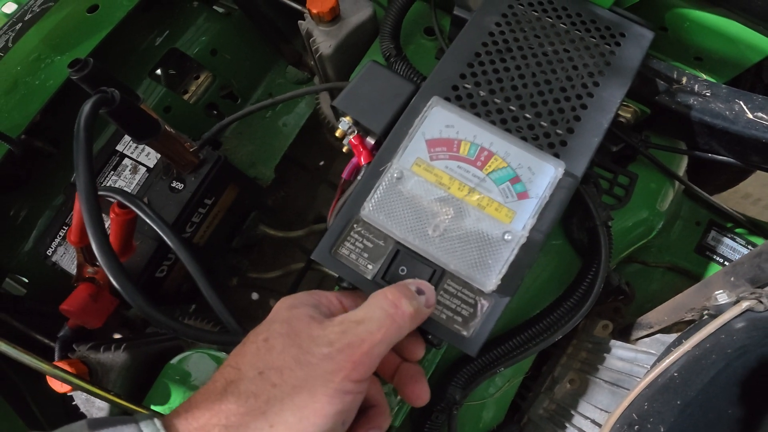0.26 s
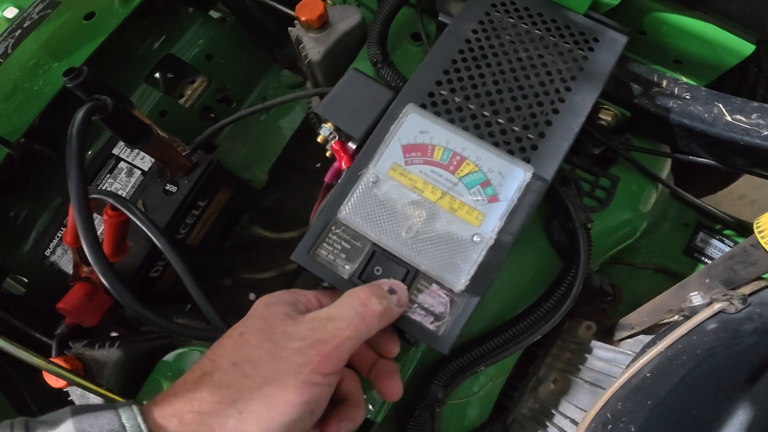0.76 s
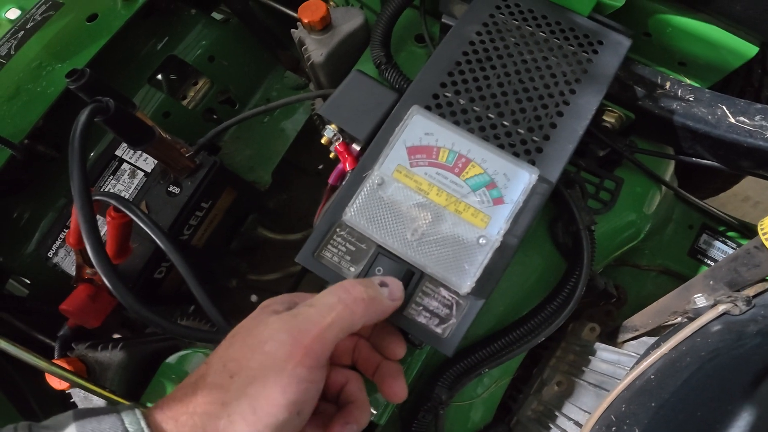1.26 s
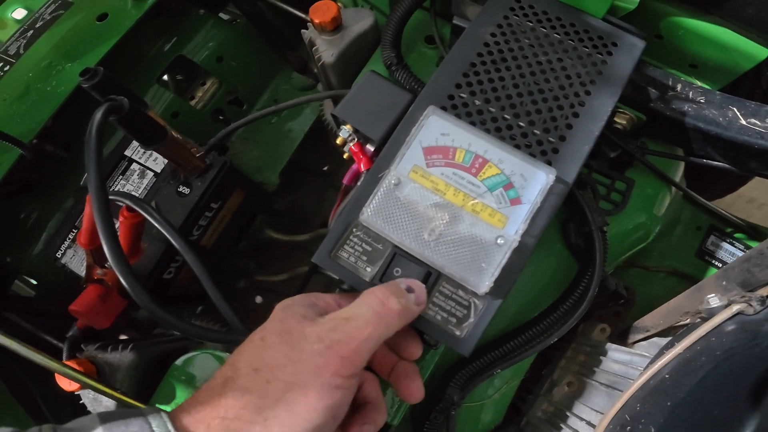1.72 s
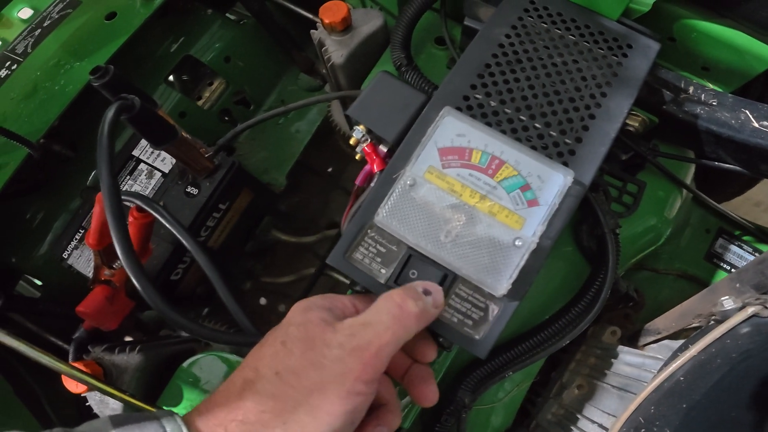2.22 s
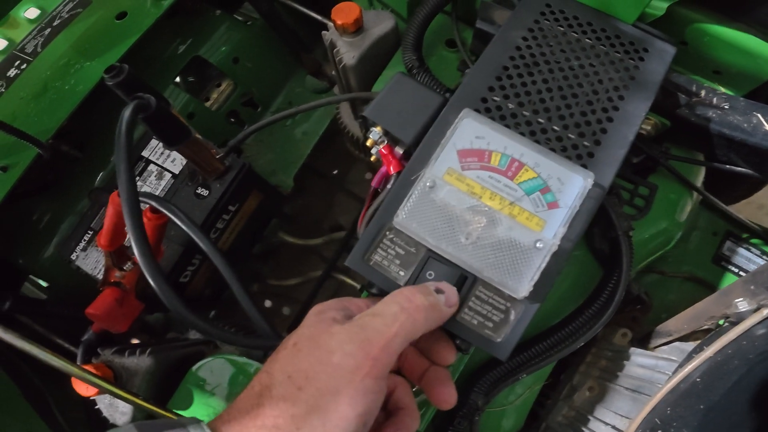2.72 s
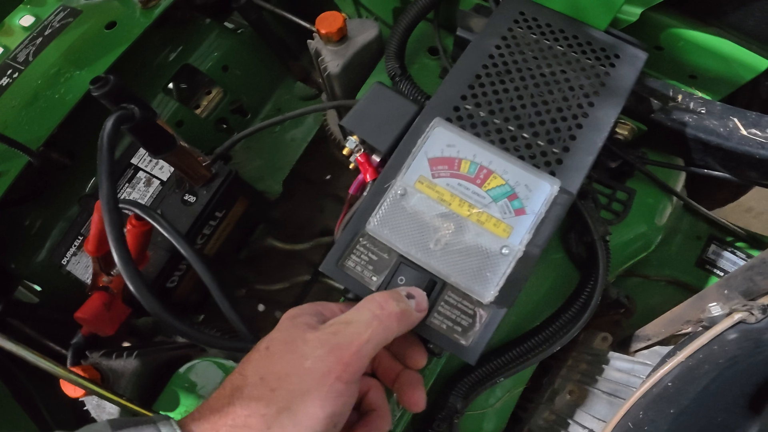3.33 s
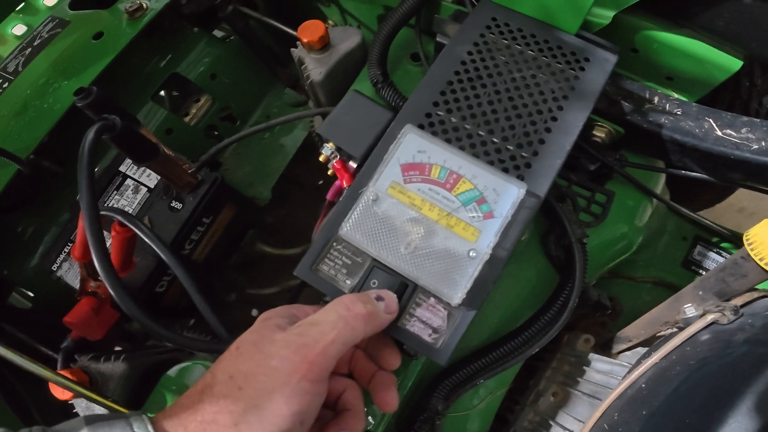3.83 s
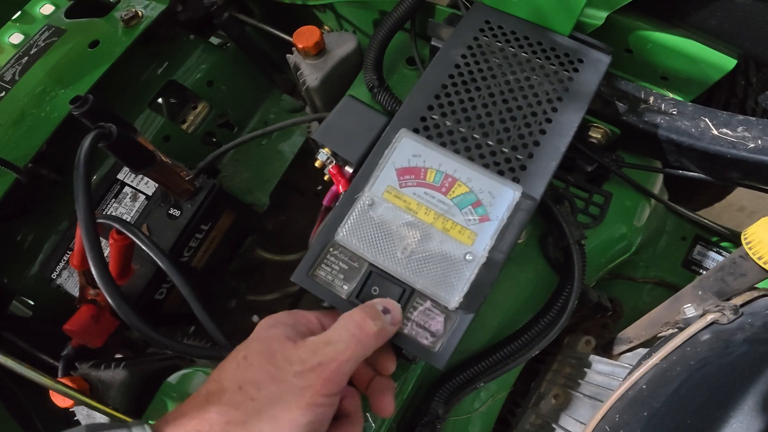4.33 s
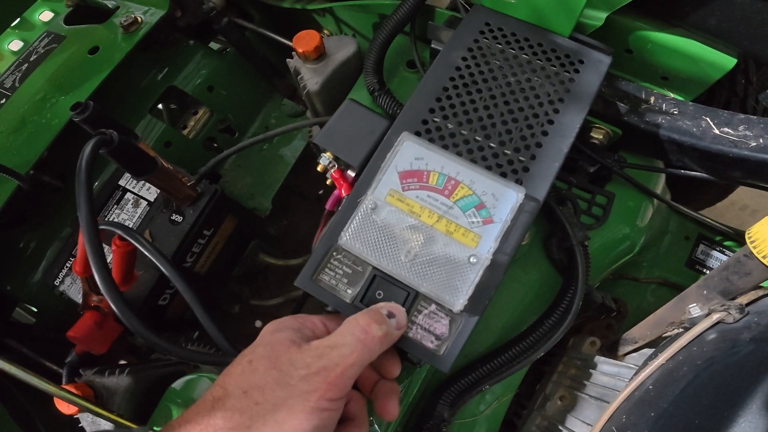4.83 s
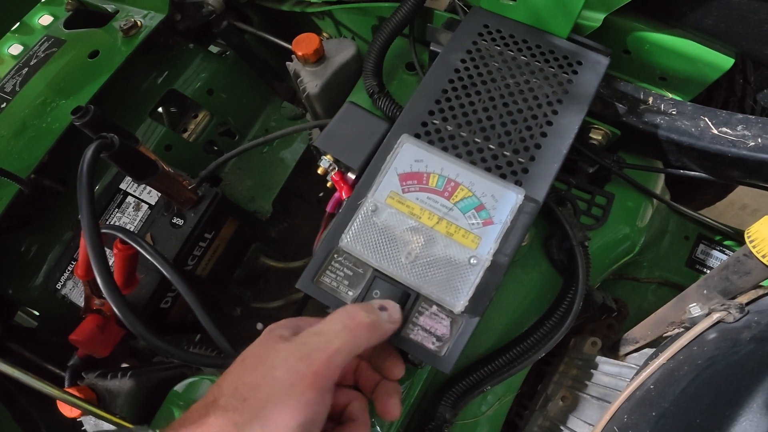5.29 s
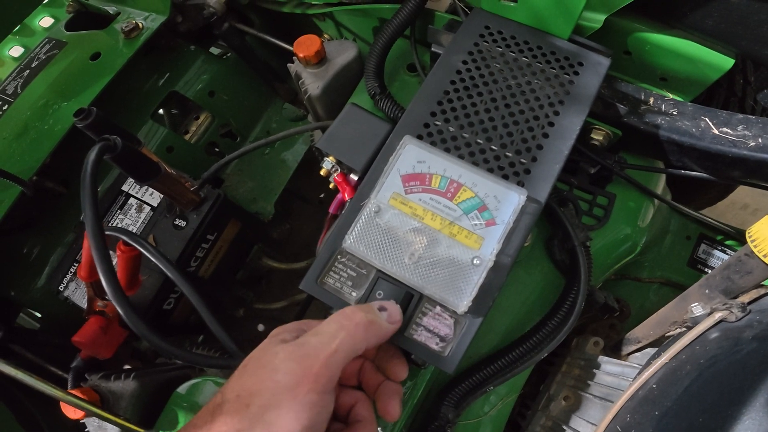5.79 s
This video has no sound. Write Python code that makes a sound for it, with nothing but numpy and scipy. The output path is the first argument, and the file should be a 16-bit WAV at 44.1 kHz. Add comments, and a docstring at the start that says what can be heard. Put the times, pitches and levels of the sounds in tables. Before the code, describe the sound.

A rocker switch on a hand-held battery tester springs back with a bright clack, leaving a brief metallic ring. A second later a press knocks hollowly in the steel case as relay contacts snap shut, and a faint hum begins to fade. Two more releases and presses follow, with faint taps and thumb rubs between them. The stereo microphone is close, in a quiet garage with low rumble.

```python
"""A hand-held battery load tester in a garage, close to a stereo microphone, over low rumble and hum.
First a thumb lets the rocker switch go: the relay contacts part with a snap, and a bright clack leaves
the spring and the steel case ringing. The hand shifts with faint taps. Then a press knocks hollowly in
the case, the contacts snap shut and rebound, and the hum starts to fade. Two more releases and presses
follow, with small ticks, bumps and rubs of the thumb around them."""
import sys
import numpy as np
from scipy import signal
from scipy.fft import rfft, irfft
from scipy.io import wavfile

SR = 44100
rng = np.random.default_rng(int(sys.argv[2]) if len(sys.argv) > 2 else 0)


def output_pcm(signal):
    """Save a mono or channel-first signal as 16-bit PCM at the path in sys.argv[1].

    Samples are clipped to [-1, 1] before scaling.
    """
    pcm = np.clip(np.atleast_2d(signal).T, -1, 1) * 32767
    wavfile.write(sys.argv[1], SR, np.round(pcm).astype(np.int16))


N = 266893
LEAD_IN, BURST = 2 ** 11, 2 ** 14  # samples: before time zero, in a noise burst
T = np.arange(SR) / SR  # the second after a blow
SOON = T[:BURST]  # long enough for a crack or an echo to die
HZ = np.fft.rfftfreq(BURST, 1 / SR)

# A blow is (t/s, level/dB, tilt/dB per octave, ring); ring multiplies the decay time of its crack.
# the rocker goes home: knock t/s, snap t/s, knock level/dB, knock ring, snap level/dB, snap ring,
# jolt level/dB
PRESSES = [(0.972, 1.0156, -0.74, 1.7, 0.27, 0.8, -13.5), (2.2642, 2.3025, 0, 1.48, 1.5, 0.9, -14.5),
           (5.3352, 5.3532, -0.47, 1.2, 3.5, 0.99, -7)]
# the mechanism springs back: t/s, level/dB, tilt/dB per octave, ring, spring level/dB,
# spring tilt/dB per octave, shift of the spring's low modes/%
RELEASES = [(-0.017, 2.5, 0.5, 1.34, 1.5, 0.5, -0.3), (1.8682, 0.5, 0.5, 1.44, 0.5, 0.5, 0),
            (4.271, 0, 0, 1.44, -3.5, 4, -1.2)]


def amp(db):
    """Decibels to gain."""
    return 10 ** (np.asarray(db) / 20)


def unit_rms(x):
    """Scales to an rms of one."""
    return x / np.sqrt(np.mean(x ** 2) + 1e-20)


def curve(points, hz):
    """Reads a table along a log-frequency axis."""
    f, value = np.transpose(points)
    return np.interp(np.log(hz + 1), np.log(f + 1), value)


def silence():
    """An empty stereo track that begins a little before time zero."""
    return np.zeros((2, LEAD_IN + N))


def add(mix, s, sound):
    """Mixes a sound into both channels at time s."""
    part = mix[:, max(LEAD_IN + round(s * SR), 0):][:, :sound.shape[-1]]
    part += sound[..., :part.shape[1]]


def noise(gain):
    """A noise burst of the given spectrum; short waves reach the microphone's two ports unalike."""
    # stereo width: f/Hz, side minus mid/dB
    port_spread = [(100, -17.5), (600, -22.5), (1500, -18.5), (3000, -13.5), (5000, -8.5), (8000, -8),
                   (11000, -4.5), (15000, -4)]
    # balance: f/Hz, left minus right/dB
    treble_lean = [(100, 0.8), (8000, -0.57), (13000, 1)]
    mid, side = gain * np.exp(2j * np.pi * rng.random((2, len(HZ))))
    side = side * amp(curve(port_spread, HZ))
    lean = amp(curve(treble_lean, HZ) / 2)
    return unit_rms(irfft([(mid + side) * lean, (mid - side) / lean], BURST))


def noise_band(hz, octaves):
    """A noise burst reaching the given octaves either side of hz."""
    return noise(1 / (1 + (np.log2((HZ + 1) / hz) / octaves) ** 6))


def bands(rows):
    """Overlapping band shapes, one a row, rolled off below the lowest."""
    centres = np.log([row[0] for row in rows])
    low_cut = 1 - np.exp(-(2 * HZ / rows[0][0]) ** 2)
    return [low_cut * np.sqrt(np.interp(np.log(HZ + 1), centres, one)) for one in np.eye(len(rows))]


def dying(t, t60, rise):
    """Envelope that swells within rise seconds and falls 60 dB in t60."""
    return (1 - np.exp(-t / rise)) * np.exp(-np.log(1000) * t / t60)


def force(db, tilt_db, hz):
    """Strength of a blow at each frequency, tilted by tilt_db per octave."""
    return amp(db + tilt_db * np.log2(hz / 2000))


def ringing(blows, modes, rise_cycles):
    """Each blow rings a part's clear modes; low ones take longer to build."""
    out = silence()
    waves = np.array([amp(db) * np.sin(2 * np.pi * hz * T) * dying(T, t60, rise_cycles / hz)
                      for hz, db, t60 in modes])
    for s, db, tilt_db, *_ in blows:
        add(out, s, force(db, tilt_db, np.transpose(modes)[0]) @ waves)
    return out


def cracking(blows, crack, rise_cycles, edge, edge_s):
    """Each blow also shakes a crowd of short modes, too dense to tell apart."""
    out = silence()
    shapes = bands(crack)
    impact = 1 + edge * np.exp(-SOON / edge_s)  # the first instant of contact is the hardest
    for s, db, tilt_db, ring in blows:
        for (hz, band_db, t60), shape in zip(crack, shapes):
            envelope = impact * dying(SOON, t60 * ring, rise_cycles / hz)
            add(out, s, force(db + band_db, tilt_db, hz) * envelope * noise(shape))
    return out


def room_tone():
    """The garage's still air: low rumble, faint hiss and a wavering hum that fades to a faint rest."""
    # spectrum of the air: f/Hz, relative density/dB
    colour = [(10, -45.5), (24, -8), (42, 0.5), (60, -7.5), (90, -13.5), (150, -18.5), (250, -30),
              (450, -33), (1000, -39), (2500, -44), (4800, -42.5), (6500, -50.5), (9500, -54.5),
              (12000, -74)]
    # how alike it is at the two ports: f/Hz, left-right likeness/0..1
    likeness = [(60, 0.46), (150, 0.89), (380, 0.08), (950, 0.01), (2380, 0.031), (5980, 0.07),
                (15000, 0.06)]
    # its balance: f/Hz, left minus right/dB
    balance = [(60, -2.5), (180, 0.5), (550, 0), (1650, 0.5), (4970, 3), (15000, -2.5)]
    hz, t = np.fft.rfftfreq(N, 1 / SR), np.arange(N) / SR
    left, other, slow = rfft(rng.standard_normal((3, N)))
    same = np.clip(curve(likeness, hz), 0, 1)
    right = same * left + np.sqrt(1 - same ** 2) * other
    lean = amp(curve(balance, hz) / 2)
    air = unit_rms(irfft(np.array([left * lean, right / lean]) * amp(curve(colour, hz)), N))
    hum_hz, hold_s, fade_db_per_s = 146.5, 0.93, 8.5
    waver = unit_rms(irfft(slow * np.exp(-(hz / 5) ** 2), N))
    hum_db = np.maximum(-60 - fade_db_per_s * np.maximum(t - hold_s, 0), -78.5)
    hum = amp(hum_db) * np.sin(2 * np.pi * hum_hz * t + 0.96 * waver)
    return amp(-58.5) * air + hum


def rattle(knock_s, snap_s):
    """Three blows as the contacts touch, snap shut and rebound, closer together after a quick press."""
    # their strengths: level/dB, tilt/dB per octave, ring
    hits = [(-10.5, -0.5, 0.9), (0.25, -1, 0.9), (-9.5, -3, 1.15)]
    # their timing: delay after the snap/s, further delay as a share of the time from knock to snap
    delays = [(-0.004, -0.137), (0, 0), (0.002, 0.54)]
    return [(snap_s + delay + share * (snap_s - knock_s), *hit)
            for (delay, share), hit in zip(delays, hits)]


def contact_snaps():
    """The relay contacts part with a small snap before each clack and rattle shut after each press."""
    # clear modes of the contacts: f/Hz, level/dB, t60/s
    modes = [(1760, -38.5, 0.07), (2953, -14.5, 0.016), (3047, -54, .29), (3542, -64.5, .3),
             (3130, -25.5, 0.025), (9060, -21, 0.016)]
    # their dense modes by band: f/Hz, level/dB, base t60/s
    crack = [(198, -48.5, 0.16), (430, -46, 0.1), (900, -35.5, 0.082), (1550, -33.5, 0.06),
             (2380, -43.5, 0.02), (3000, -26.5, 0.032), (4770, -35, 0.081), (6700, -28, .033),
             (9000, -25.5, 0.031), (10370, -36.5, 0.016), (12800, -28.5, 0.035), (14100, -40, .023)]
    snaps = [(s - 0.0075, db - 11, 2, 0.66) for s, db, *_ in RELEASES]
    for knock_s, snap_s, _, _, snap_db, snap_ring, _ in PRESSES:
        for s, db, tilt_db, ring in rattle(knock_s, snap_s):
            snaps.append((s, snap_db + db, tilt_db, snap_ring * ring))
    tones = ringing(snaps, modes, rise_cycles=2.0)
    return tones + cracking(snaps, crack, rise_cycles=3.2, edge=0.45, edge_s=0.0058)


def release_clacks():
    """The mechanism springs back with a bright clack."""
    # clear modes of the mechanism: f/Hz, level/dB, t60/s
    modes = [(190, -32, 0.079), (458.3, -47.5, 0.17), (616, -32.5, .14), (1068.6, -41, .07),
             (1345, -35.5, 0.068), (1515, -25, 0.05), (1616, -30.5, .06), (2088, -41, .08),
             (2400, -29, 0.053), (2518, -27, 0.07), (3494, -27.5, .05), (3600, -24.5, 0.035),
             (4230, -27.5, .03), (4597, -37, .07), (7530, -28.5, 0.035), (9940, -27.5, 0.014)]
    # its dense modes by band: f/Hz, level/dB, base t60/s
    crack = [(193.4, -48, 0.18), (576, -48, 0.13), (900, -38.5, .1), (1500, -32, 0.05), (1893, -40, .05),
             (2400, -32, .055), (3050, -36, .05), (3500, -27.5, 0.049), (5160, -30, 0.037),
             (7500, -29, .028), (9600, -24, 0.023), (11900, -29, .021), (15800, -29.5, 0.022)]
    clacks = [row[:4] for row in RELEASES]
    tones = ringing(clacks, modes, rise_cycles=1.8)
    return tones + cracking(clacks, crack, rise_cycles=0.64, edge=0.74, edge_s=0.0015)


def spring_ring(low_modes_hz=3800):
    """The return spring sings on after each release; the grip detunes its low modes."""
    # modes of the spring: f/Hz, level/dB, t60/s
    modes = [(1347, -45.5, .49), (2490, -67, 0.7), (3553, -49, 0.3), (4003, -68, 0.5), (4183, -51.5, 0.29),
             (6234, -69.5, .55), (6810, -67, 0.52), (7144, -68.5, 0.8), (7354, -55.5, 0.55),
             (8183, -64, .25), (8689, -72, 0.65), (8830, -51.5, 0.24), (8977, -57.5, .27)]
    out = silence()
    for s, *_, level_db, tilt_db, shift in RELEASES:
        detuned = [(hz * (1 + shift / 100 * (hz < low_modes_hz)), db, t60) for hz, db, t60 in modes]
        out += ringing([(s, level_db, tilt_db)], detuned, rise_cycles=3.0)
    return out


def hand_taps():
    """The hand shifts on the case, each time a dull thud with a small tick."""
    # taps: t/s, thud level/dB, thud f/Hz, tick level/dB, t60/s
    taps = [(0.184, -68.5, 600, -63.5, 0.076), (0.236, -62.5, 720, -74, 0.034),
            (1.197, -57.5, 844, -68, 0.11), (1.427, -66, 608, -80, 0.05), (1.7482, -44.5, 540, -60, 0.09),
            (2.506, -60, 720, -78, 0.064), (2.551, -54.5, 860, -49, 0.088), (4.234, -61.5, 800, -59, 0.05),
            (5.604, -62, 589, -72, 0.047)]
    out = silence()
    for s, thud_db, thud_hz, tick_db, t60 in taps:
        thud = amp(thud_db) * noise_band(thud_hz, octaves=0.4)
        tick = amp(tick_db) * noise_band(1950, octaves=1.1)
        add(out, s, (thud + tick) * dying(SOON, t60, rise=0.0005))
    return out


def case_knocks():
    """The steel case knocks hollowly as the rocker seats, and again as the contacts jolt it."""
    # clear modes of the case: f/Hz, level/dB, t60/s
    modes = [(170.1, -31.5, 0.14), (232.5, -44.5, 0.2), (341, -43, 0.06), (459, -32.5, 0.18),
             (630.5, -16, 0.067), (679, -17, 0.05), (720, -18, 0.043), (764, -49, 0.45), (866, -31.5, 0.1),
             (895.7, -22.5, 0.089), (1025, -23, .06), (1093, -29, 0.068), (1335, -34, 0.058),
             (1469.5, -27, 0.091), (1606, -53.5, 0.5), (2085, -36.5, 0.048), (2585, -35, 0.064),
             (3630, -36, 0.068), (4430, -36.5, 0.089), (4581, -64, .34), (6160, -28.5, 0.023)]
    # its dense modes by band: f/Hz, level/dB, base t60/s
    crack = [(278, -59.5, 0.092), (779.7, -37, 0.15), (1360, -36.5, 0.14), (2780, -40, 0.086),
             (4500, -34.5, 0.046), (6762, -29, 0.016), (9000, -39.5, 0.025), (11100, -49, .035),
             (12900, -36.5, 0.016), (15000, -53, .03)]
    knocks = []
    for knock_s, snap_s, knock_db, ring, _, _, jolt_db in PRESSES:
        graze = (knock_s - 0.003, knock_db - 13, -2.06, 1.7)  # the rocker brushes its stop first
        seat = (knock_s, knock_db, -1, ring)
        jolts = [(s + 0.003, jolt_db + db, 1, 1.0) for s, db, *_ in rattle(knock_s, snap_s)]
        knocks += [graze, seat, *jolts]
    tones = ringing(knocks, modes, rise_cycles=2.7)
    return tones + cracking(knocks, crack, rise_cycles=1.4, edge=0.62, edge_s=0.0024)


def contact_ticks():
    """The relay contacts touch lightly now and then, each time a small tick."""
    # ticks: t/s, level/dB, f/Hz, half-width/octaves
    ticks = [(1.7205, -62.5, 3612, 0.5), (2.551, -65.5, 6960, 0.74), (3.275, -73, 7400, 0.37),
             (4.119, -70, 3050, 0.2)]
    out = silence()
    for s, db, hz, octaves in ticks:
        add(out, s, amp(db) * noise_band(hz, octaves) * dying(SOON, t60=0.042, rise=0.0005))
    return out


def case_bumps():
    """Soft bumps of the held case, each a few cycles of a low tone."""
    # bumps: t/s, level/dB, f/Hz, length/s
    bumps = [(1.765, -44, 60.07, 0.03), (5.846, -47, 106.6, 0.069)]
    out = silence()
    for s, db, hz, length in bumps:
        t = T[T < length]
        add(out, s, amp(db) * np.sin(2 * np.pi * hz * t) * np.hanning(len(t)))
    return out


def thumb_rubs(swell_db=13):
    """The thumb rubs harder and harder until the rocker gives."""
    # rubs: t/s, length/s, final level/dB
    rubs = [(1.795, 0.067, -59.5), (4.12, 0.145, -65), (5.29, 0.043, -65.5)]
    # spectrum of the friction: f/Hz, relative level/dB
    colour = [(250, -12), (650, 7.5), (1200, -3), (2000, -11), (3500, -5.5), (6000, -18), (9000, -18.5),
              (15000, -30)]
    out = silence()
    for s, length, db in rubs:
        t = T[T < length]
        swell = amp(db - swell_db * (1 - t / length)) * signal.windows.tukey(len(t), 0.1)
        add(out, s, swell * noise(amp(curve(colour, HZ)))[:, :len(t)])
    return out


def garage(direct):
    """What reaches the microphone: direct sound, a few near echoes and a short diffuse tail."""
    # the garage's reverberation by band: f/Hz, level/dB, t60/s
    decay = [(151, -15.5, 0.28), (400, -21, .3), (664, -11.5, 0.15), (1070, -24.5, 0.26),
             (1820, -23.5, .35), (3450, -22.5, 0.29), (7100, -29.5, 0.44), (10000, -25, 0.27),
             (12500, -26, 0.19), (16000, -29, .2)]
    # reflections off the machine below: delay/s, level/dB
    reflections = [(.0031, -12), (.0074, -15), (0.0127, -22.5), (0.0174, -29.5)]
    response = 0
    for (hz, db, t60), shape in zip(decay, bands(decay)):
        envelope = dying(SOON, t60, rise=0.006)
        wash = noise(shape) * np.sqrt(np.mean(shape ** 2))
        response = response + amp(db) * wash * envelope / np.linalg.norm(envelope)
    tail = signal.fftconvolve(direct, response, axes=1)[:, :LEAD_IN + N]
    # small curved surfaces throw back only the treble
    treble = signal.sosfilt(signal.butter(1, 2000, "high", fs=SR, output="sos"), direct)
    echoes = sum(amp(db) * np.roll(treble, round(delay * SR), axis=1) for delay, db in reflections)
    return (direct + echoes + tail)[:, LEAD_IN:]


def scene():
    """The tester in the hand, close to the microphone, with the garage around it."""
    switch = case_knocks() + contact_snaps() + release_clacks() + spring_ring()
    handling = hand_taps() + contact_ticks() + case_bumps() + thumb_rubs()
    return garage(switch + handling) + room_tone()


def record(dry):
    """The recorder's band limit, at 16.5 kHz."""
    low_pass = signal.firwin(301, 16500, window=("kaiser", 9), fs=SR)
    return signal.oaconvolve(dry, low_pass[None], "same")


dry = scene()
out = record(dry)
output_pcm(out)
```